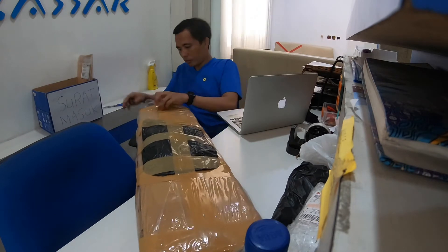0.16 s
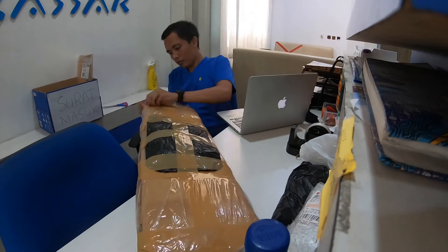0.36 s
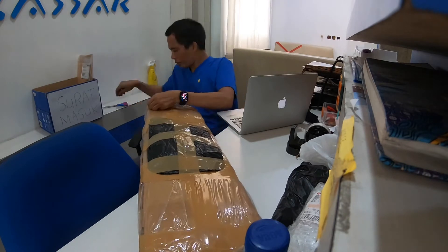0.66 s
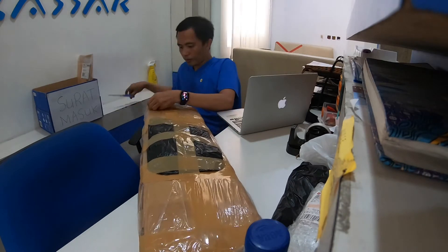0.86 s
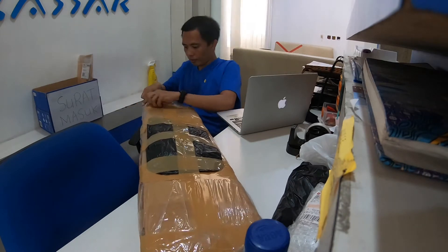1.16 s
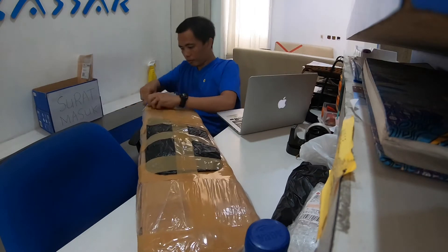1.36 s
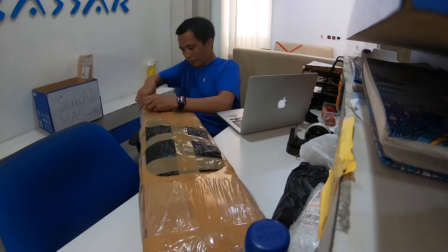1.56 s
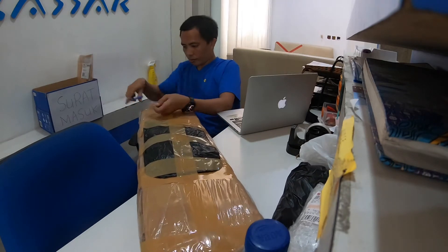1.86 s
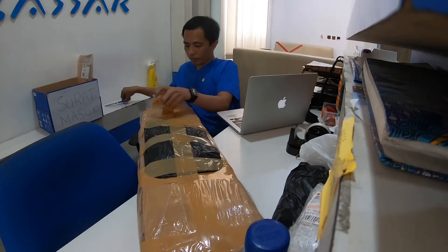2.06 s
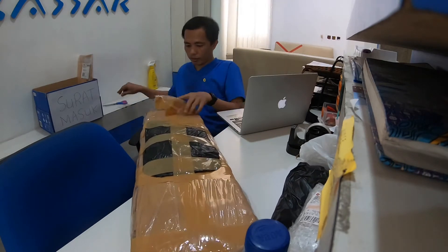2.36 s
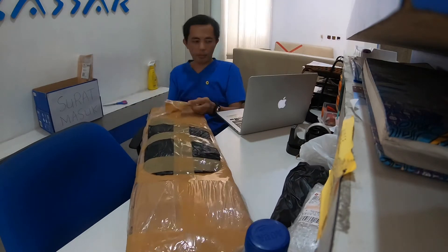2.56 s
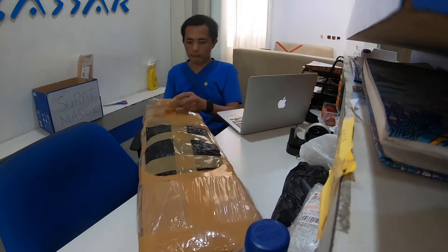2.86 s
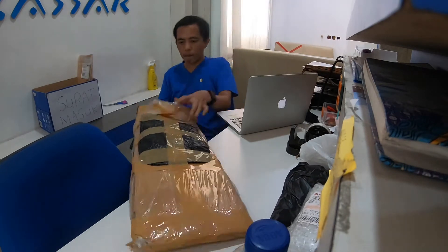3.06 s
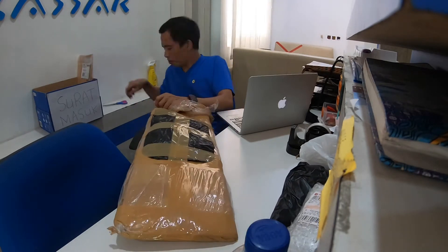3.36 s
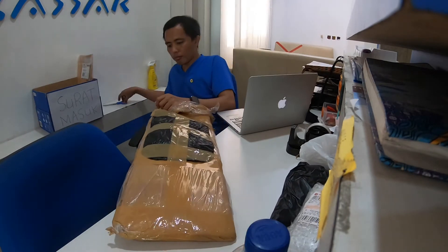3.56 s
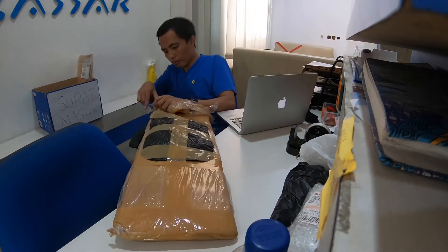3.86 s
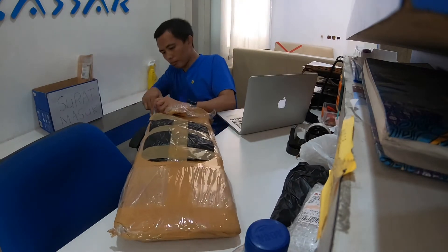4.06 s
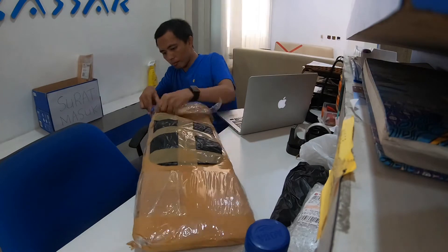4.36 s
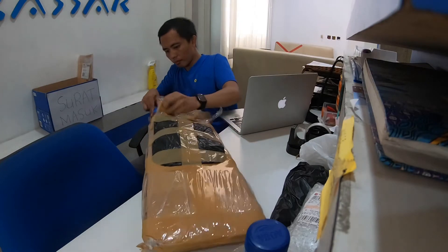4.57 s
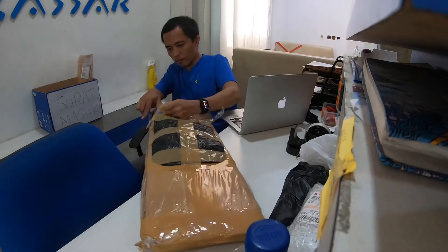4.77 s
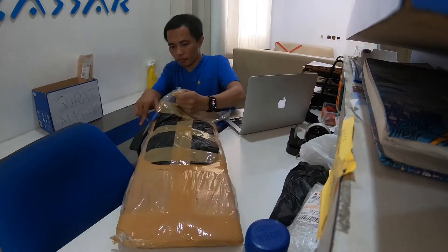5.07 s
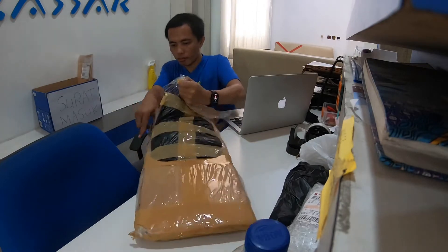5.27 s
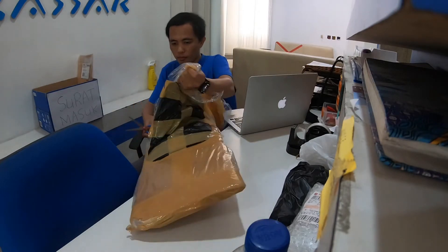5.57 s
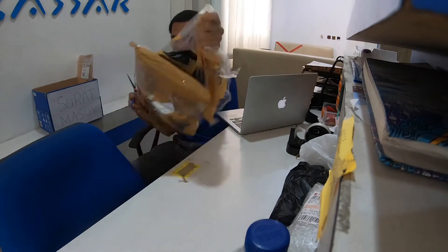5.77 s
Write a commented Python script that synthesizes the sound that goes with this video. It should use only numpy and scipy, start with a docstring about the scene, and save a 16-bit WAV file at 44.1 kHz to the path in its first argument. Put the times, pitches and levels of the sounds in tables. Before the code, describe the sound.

Close, dry crackles of plastic wrap and ringing tape snaps mix with hollow cardboard bumps and short drags across a desk in a quiet office.

```python
"""Parcel unwrapped on a desk

A taped parcel is opened by hand on an office desk, before a small camera standing on the same desk.
Plastic wrap crinkles and snaps as shaped noise, and taut tape rings through a bank of resonances.
Bumps ring the parcel wall as decaying modes, and bumps and drags drum the swaying modes of the desk top.
Ventilation hisses and hums steadily; the camera's stereo picture collapses to mono twice and reopens."""
import sys
import numpy as np
from scipy import signal
from scipy.fft import rfft, irfft, next_fast_len
from scipy.io import wavfile
from scipy.ndimage import map_coordinates

SR = 44100
rng = np.random.default_rng(int(sys.argv[2]) if len(sys.argv) > 2 else 0)


def dump_mix(stems):
    """Bounce the given channels to the path in sys.argv[1] as a 16-bit WAV at rate SR."""
    frames = np.atleast_2d(stems).T  # one column per channel
    limited = np.clip(frames, -1, 1)  # hard clip at full scale
    pcm = np.round(limited * 32767).astype(np.int16)
    wavfile.write(sys.argv[1], SR, pcm)


N = 260631

# Ventilation hiss, spectral density: (frequency [Hz], relative level [dB])
AIR_SPECTRUM = [(30, -55), (80, -32), (170, -21), (340, -27), (455, 1.5), (560, -13.5), (850, -23),
                (1600, -19), (5000, -15), (10000, -28.5), (14000, -67), (16000, -55)]
# Duct resonances: (frequency [Hz], width [Hz], relative level [dB])
DUCT_MODES = [(331.5, 11.3, -5.5), (455.2, 6.4, 6), (540, 99, -19), (795, 49, -9)]
HISS_DB, HUM_DB = -50.5, -47.5

# Parcel shoved over the desk:
# (time [s], rise constant [s], length [s], drumming level [dB], low modes re drumming [dB])
SHOVES = [(-0.01, .01, .05, -27.5, -16), (0.064, .008, .035, -8.5, -25),
          (0.108, 0.008, 0.049, -14.5, -10.5), (1.294, 0.02, 0.1, -18, -9.5),
          (1.435, .008, 0.058, -26.5, -20), (1.512, .008, 0.033, -15.5, -7.5), (1.569, .02, 0.041, -23, -5),
          (1.689, 0.028, 0.11, -13, -13), (1.83, 0.019, 0.052, -18, -5.5), (1.91, 0.0065, 0.026, -29, -9),
          (2.01, 0.021, .05, -34.5, -18), (2.246, 0.0072, 0.056, -18, -7), (2.42, .008, 0.028, -34, -20),
          (2.557, 0.0042, 0.023, -18, -14), (2.748, .008, 0.063, -29, -13), (2.885, .006, 0.14, -37, -8.5),
          (3.152, .02, 0.086, -33.5, -9), (3.91, .006, .06, -41, -12), (4.001, .008, 0.026, -34, -2),
          (4.125, .01, 0.029, -32, -13), (4.381, 0.0051, 0.064, -9, -18), (4.454, 0.0053, 0.043, -21, -3.5),
          (4.635, 0.028, .11, -28.5, -10), (4.82, .02, 0.052, -38, -8), (4.912, .005, 0.011, -18, -10),
          (4.942, .01, 0.055, -29, 1), (4.999, .025, 0.06, -18, -11), (5.099, .05, 0.076, -11.5, -18),
          (5.224, .008, 0.061, -24, -7.5), (5.366, 0.01, 0.089, -11, -9.5), (5.518, 0.013, 0.082, -20, -12),
          (5.605, .006, .05, -42, -19)]
SAG_DB_PER_S, STOP_DB_PER_S = 79, 602  # decay while sliding; further decay after the stop
# Hands resting and working on the parcel: (time [s], drumming level [dB], scuff level [dB])
HANDS = [(0, -45, -27.5), (.06, -45, -47), (.3, -49, -44.5), (.55, -70, -45), (.8, -55, -46.5),
         (1.15, -56.5, -42.5), (1.6, -37, -43), (2, -58, -45.5), (2.6, -44, -42.5), (3, -48, -39),
         (3.3, -50.5, -43.5), (3.8, -61, -49), (4.15, -48, -37), (4.6, -50, -46.5), (4.9, -54, -40.5),
         (5.3, -53, -40), (5.7, -56, -41.5), (5.91, -56, -44.5)]
HANDS_LOW_DB, SHOVE_SCUFF_DB = -12, -23  # both relative to the drumming
# Parcel bumps: (time [s], relative wall level [dB], relative desk level [dB], decay scale [s])
BUMPS = [(0.062, -14, -10, 0.095), (0.117, -19, -16, 0.069), (0.331, -25, -25, 0.21),
         (0.447, -25.5, -34, 0.19), (0.596, -44, -36, 0.046), (1.168, -28.5, -23.5, 0.12),
         (1.285, -25.5, -33, 0.11), (1.316, -30, -22, 0.079), (1.436, -43, -28.5, 0.14),
         (1.51, -21.5, -13.5, 0.13), (1.57, -37, -32, 0.067), (1.71, -33, -19.5, 0.13),
         (1.821, -23, -23, 0.082), (1.851, -28, -17.5, 0.06), (1.895, -29, -23, 0.11),
         (2.013, -32, -40, 0.11), (2.249, -22, -14, 0.13), (2.426, -32, -39, 0.061),
         (2.562, -13, -11, 0.062), (2.712, -24, -22, 0.068), (2.762, -27.5, -25.5, 0.073),
         (2.889, -39, -46, 0.08), (2.911, -24, -27, 0.074), (2.947, -32, -30, 0.097),
         (3.093, -33, -46, 0.09), (3.151, -16, -27.5, 0.09), (3.179, -31, -40, 0.1),
         (3.701, -40, -47, 0.16), (3.9, -39, -41, 0.098), (4.004, -31, -32.5, 0.16),
         (4.068, -29.5, -35.5, 0.25), (4.134, -24.5, -23, 0.095), (4.214, -34, -31, 0.1),
         (4.383, -11, -13, 0.086), (4.409, -17, -5, 0.029), (4.555, -29, -33, 0.084),
         (4.634, -21, -31.5, 0.2), (4.684, -34, -31, 0.098), (4.727, -27.5, -28.5, 0.1),
         (4.804, -26, -32.5, 0.094), (4.912, -22.5, -24, 0.09), (4.962, -23.5, -22.5, 0.1),
         (5.014, -23.5, -19, 0.11), (5.082, -19, -23, 0.046), (5.104, -21.5, -23, 0.056),
         (5.22, -45, -25.5, 0.14), (5.363, -14, -19.5, 0.081), (5.521, -20.5, -30, 0.059),
         (5.557, -24.5, -29, 0.32)]
# Desk top modes: (frequency [Hz], kicked level [dB], share of decay scale [1], dragged level [dB])
DESK_MODES = [(75, -21, 0.74, -7.5), (112.9, -11, 1.15, -1.5), (182.5, 3.5, 0.81, 0.5),
              (247.1, -1.5, 0.56, -15), (342, -3, 1.09, -14.5)]
# Parcel wall modes: (frequency [Hz], relative level [dB], share of decay scale [1])
WALL_MODES = [(423.5, 1.5, 0.27), (540.4, 1.5, 0.27), (655, -3.5, 0.39), (791, -4.5, 0.41),
              (972, -15, 0.48), (1160, -13.5, 0.086), (1485, -15, 0.16), (2070, -30, 0.03)]
# Scuffing, spectral density: (frequency [Hz], relative level [dB])
SCUFF_SPECTRUM = [(120, -10), (300, 0), (500, 1), (850, -7), (1300, -17), (2500, -37)]

# Film handled: (time [s], crinkle level [dB], fizz level [dB], rasp level [dB])
HANDLING = [(0.0, -43.5, -46, -29.5), (0.1, -42, -49, -49.5), (0.21, -59, -50, -33.5),
            (0.3, -56, -50, -54.5), (0.8, -56.5, -53, -50), (1.12, -55.5, -78, -54), (1.76, -46, -56, -52),
            (2.1, -47.5, -72, -49.5), (2.55, -51, -52, -49), (3.05, -51.5, -49, -52.5),
            (3.46, -57, -55, -52), (3.64, -61, -64, -44.5), (3.95, -46, -56, -54), (4.3, -50, -74, -49),
            (4.61, -57, -56, -57), (4.79, -44.5, -64, -44), (5.2, -48.5, -66, -47.5),
            (5.5, -40, -56.5, -44), (5.63, -50, -66, -49), (5.76, -35, -39, -39.5), (5.91, -42.5, -47, -58)]
# Snaps: (time [s], relative level [dB], relative tape level [dB], relative sheen level [dB],
# fold frequency [Hz], decay scale [s], crack re snap [dB])
SNAPS = [(0.054, -24, -30, -42, 7090, .25, 5), (.0778, -21, -28, -42, 7120, 0.31, 2),
         (0.1325, -12, -2.5, -18, 3500, .15, -4), (0.1437, -9, -13, -24, 1920, .19, -10),
         (0.2126, -23.5, -37, -38, 2800, .25, 7), (0.3594, -30.5, -41, -49, 5430, .17, 6),
         (0.4142, -29, -54, -50, 3370, 0.27, 2), (.903, -23.5, -29.5, -52, 1840, 0.2, -2),
         (1.0874, -25, -41, -44, 1970, 0.5, 2), (1.2863, -28, -39, -44, 1840, 0.37, -1),
         (1.5815, -28.5, -47, -46, 7430, 0.16, 2), (1.707, -25, -37, -39, 8920, 0.2, 7),
         (1.8202, -19, -34, -20, 3080, 0.5, 0.5), (2.0072, -28, -46, -41, 3250, .086, -2),
         (2.0193, -16.5, -39, -49, 6600, .13, 13), (2.1066, -20, -24, -36, 7060, 0.32, 2),
         (2.1387, -26.5, -37, -47, 6900, 0.35, -3), (2.3642, -10, -15, -30, 2720, 0.1, -5),
         (2.3691, -9.5, -8, -18, 1910, 0.27, 1.5), (2.4206, -45, -20.5, -39, 1950, 0.35, 9),
         (2.56, -20.5, -33, -48, 2520, 0.42, 3), (2.7497, -36, -32, -50, 4330, .15, 1),
         (2.807, -18, -25.5, -44, 1930, 0.21, -4), (2.9254, -35, -51, -26, 2540, 0.33, 3),
         (2.9726, -18.5, -24, -20, 5270, 0.37, -5), (3.127, -33, -43, -46, 3740, .2, 2),
         (3.3166, -23.5, -31.5, -49, 5510, 0.33, 3), (3.404, -29.5, -51, -38, 4180, .19, 2),
         (3.434, -30, -43, -48, 2990, .22, 0), (3.641, -45, -25.5, -48, 1950, 0.37, -6),
         (3.6678, -34, -25.5, -36, 7300, 0.27, 2), (3.6884, -22.5, -39, -31, 1950, .33, 0),
         (3.8704, -34, -36, -34, 2390, 0.6, -3), (3.9854, -30, -41, -43, 4500, 0.24, 5),
         (4.0743, -31, -33, -53, 3200, .17, 8), (4.1255, -27, -29.5, -49, 3880, .15, -3),
         (4.1889, -30, -46, -50, 6200, .22, 4), (4.3366, -26.5, -40, -40, 9300, .54, 0),
         (4.5586, -22, -31.5, -42, 9300, 0.47, 7), (4.6341, -18, -18, -19, 9450, 0.33, 7),
         (4.7007, -25.5, -38, -51, 2090, .53, 4), (4.8584, -21.5, -32, -48, 2570, .39, 2),
         (4.9009, -18.5, -20, -40, 2460, 0.26, 5.5), (4.9129, -21, -30, -37, 3100, 0.27, 4),
         (5.0428, -17, -37, -30, 8150, 0.26, -3), (5.1908, -20, -30.5, -35, 7200, 0.41, 11),
         (5.255, -25.5, -42, -40, 7100, 0.33, -5), (5.3719, -13, -20.5, -52, 2950, 0.33, 6),
         (5.4924, -28, -42, -38, 7960, 0.46, 2), (5.7014, -25, -30, -39, 3330, .35, -1),
         (5.7457, -26, -40, -36, 9690, .22, -1), (5.7907, -22, -29, -32, 8300, .3, -5),
         (5.817, -14, -28, -21, 9700, 0.16, 0), (5.8352, -32, -37, -34, 5040, 0.15, 4)]
FOLD_DB, CLICK_DB = -8.5, -5.5  # fold noise re snap level; first click re crack
# Taut tape resonances: (frequency [Hz], width [Hz], relative level [dB])
TAPE_MODES = [(848, 212, 2.5), (991, 50, 10), (1096, 54, 2.5), (1176.4, 18, 9), (1373, 105, 0),
              (1858, 35, -0.5), (1959, 30, -1.5), (2203, 54, -9.5), (2767, 90, -9), (3636, 40, -3.5),
              (5720, 250, -14), (7130, 200, -10.5), (8860, 280, -13.5), (10830, 320, -14.5)]
# Crinkling film, spectral density: (frequency [Hz], relative level [dB])
FILM_SPECTRUM = [(1200, -2.5), (2500, 0.5), (4000, 0), (5300, -1), (7200, 2.5), (9000, -0.5), (11000, -2),
                 (16000, -11)]
# Fizzing top of the film, spectral density: (frequency [Hz], relative level [dB])
SHEEN_SPECTRUM = [(6000, -72), (10500, -13), (13000, 2.5), (15000, -4), (16000, 5)]

# Side channel against mid: (frequency [Hz], level [dB], phase [rad], likeness [0-1])
SIDE_RELATION = [(35, -4, 1.57, 0.4), (110, 5.4, 2.98, 0.92), (180, -1.6, -2.28, 0.89),
                 (260, -1.6, -1.66, 0.21), (340, 0.5, -0.08, 0.7), (450, 0.7, -0.88, 0.52),
                 (800, 7.3, 0.08, 0.74), (1100, 4.0, -0.75, 0.4), (1800, 6.5, 2.77, 0.54),
                 (2300, 5.8, 2.39, 0.45), (4000, 1.0, 1.39, 0.58), (7000, -2.3, 0.13, 0.29),
                 (9000, -5.2, 1.72, 0.38), (15000, -2.8, 2.81, 0.46)]
# Colour of the mono setting: (frequency [Hz], level [dB])
MONO_COLOUR = [(60, -5), (110, 0), (250, -6.5), (460, 2), (800, -7), (2000, 2.5), (8000, -2.5),
               (14000, -0.5)]
# Fully mono: (from time [s], to time [s])
MONO_SPELLS = [(.43, 0.79), (2.75, 3.273)]
CLOSE_S, OPEN_S, WIDE = 0.38, 0.41, 0.94  # fade into mono, fade out of it, stereo share otherwise
TOP_HZ = 15900  # nothing passes from here up


def amp(db):
    """Decibel law: 20 dB is a factor of ten in amplitude."""
    return 10 ** (np.asarray(db) / 20)


def unit(x):
    """Normalisation to an rms of 1."""
    return x / np.sqrt(np.mean(x ** 2) + 1e-20)


def along(points, hz):
    """Interpolation on a log frequency axis, for each column after the frequency."""
    knots_hz, *columns = np.transpose(points)
    return [np.interp(np.log(hz + 1), np.log(knots_hz + 1), column) for column in columns]


def curves(rows):
    """Linear interpolation in time: one value per sample for each column after the time."""
    knots_s, *columns = np.transpose(rows)
    return [np.interp(np.arange(N) / SR, knots_s, column) for column in columns]


def wobble(rate):
    """Band-limited chance: two smooth random curves with rate knots a second."""
    step = np.arange(0, N + 64, 64)
    knots = rng.standard_normal((2, int(N * rate / SR) + 4))
    smooth = [map_coordinates(row, [step * rate / SR]) for row in knots]
    return np.array([np.interp(np.arange(N), step, row) for row in smooth])


def filtered(x, response):
    """Linear filtering: the spectrum is multiplied by a complex response of frequency."""
    m = next_fast_len(N + SR // 2)
    return irfft(rfft(x, m) * response(np.fft.rfftfreq(m, 1 / SR)), m)[..., :N]


def tinted(x, spectrum):
    """Spectral shaping, scaled so that white noise keeps rms 1."""
    return filtered(x, lambda hz: unit(amp(along(spectrum, hz)[0])))


def ringing(x, modes):
    """Modal superposition: parallel resonances of alternating sign; white noise keeps rms 1."""
    def response(f):
        total = 0
        for k, (centre, width, db) in enumerate(modes):
            damping = 1j * f * width
            total = total + (-1) ** k * amp(db) * damping / (centre * centre - f * f + damping)
        return total / np.sqrt(np.mean(np.abs(total) ** 2))
    return filtered(x, response)


def crackle(spiky_db, clump_db):
    """Impulsive noise: dense creases of uneven size that come in clumps, rms 1."""
    size = amp(spiky_db * rng.exponential(size=N) + clump_db * wobble(35)[0])
    return unit(size * rng.standard_normal((2, N)))


def air():
    """Broadband flow noise: steady ventilation hiss, with noise-driven duct resonances as a fuzzy hum."""
    level = amp(HISS_DB + 0.16 * wobble(2.0))
    hiss = level * tinted(rng.standard_normal((2, N)), AIR_SPECTRUM)
    return hiss + amp(HUM_DB) * ringing(rng.standard_normal((2, N)), DUCT_MODES)


def shoves():
    """Sliding friction: each shove builds up, sags and stops short; upper and low modes apart."""
    size, t = np.zeros((2, N + SR)), np.arange(SR // 3) / SR
    lead = SR // 2  # room for a shove begun before time zero
    for s, rise, length, db, low_db in SHOVES:
        fall_db = -SAG_DB_PER_S * t - STOP_DB_PER_S * np.clip(t - length, 0, 1)
        shape = (1 - np.exp(-t / rise)) * amp(fall_db)
        start = round(s * SR) + lead
        size[:, start:start + len(t)] += amp([[db], [db + low_db]]) * shape
    return size[:, lead:][:, :N]


def mode_envelope(t, hz, share, t60):
    """Modal damping: exponential decay after an onset that is quicker for higher modes."""
    return amp(-60 * t / (t60 * share + 0.012)) * (1 - np.exp(-t * hz / 0.46))


def swaying_mode(hz):
    """Random modulation: a sine whose level and pitch wander."""
    level = amp(wobble(30))
    phase = 2 * np.pi * np.cumsum(hz * (1 + 0.06 * wobble(30)), axis=1) / SR
    return level * np.sin(phase)


def desk():
    """Modal excitation: drags keep the desk modes shuddering; bumps kick them and ring the parcel wall."""
    wall, kick = np.zeros((2, N + SR)), np.zeros((len(DESK_MODES), N + SR))
    t = np.arange(SR // 5) / SR
    wall_hz, mode_db, wall_share = np.transpose(WALL_MODES)[..., None, None]
    desk_hz, kicked_db, desk_share, dragged_db = np.transpose(DESK_MODES)[..., None]
    chance = rng.standard_normal((len(BUMPS), 2, len(WALL_MODES), 2, 1))
    for (s, wall_db, desk_db, t60), (level_luck, pitch_luck) in zip(BUMPS, chance):
        span = slice(round(s * SR), round(s * SR) + len(t))
        pitch = wall_hz * (1 + 0.057 * pitch_luck)  # each mode of each bump lands at a slightly random pitch
        level = amp(wall_db - 2.0 + mode_db + 1.2 * level_luck)
        tones = level * mode_envelope(t, wall_hz, wall_share, t60) * np.sin(2 * np.pi * pitch * t)
        wall[:, span] += np.sum(tones, axis=0)
        kick[:, span] += amp(desk_db + kicked_db) * mode_envelope(t, desk_hz, desk_share, t60)

    drum_db, scuff_db = curves(HANDS)
    upper, low = np.hypot(shoves(), amp([drum_db, drum_db + HANDS_LOW_DB]))
    drag = amp(dragged_db) * np.where(desk_hz < 140, low, upper)
    mode_sizes = np.hypot(drag, kick[:, :N])
    shudder = sum(size * swaying_mode(mode[0]) for size, mode in zip(mode_sizes, DESK_MODES))

    scuff_size = np.hypot(amp(scuff_db), amp(SHOVE_SCUFF_DB) * upper)
    scuff = scuff_size * tinted(crackle(spiky_db=2.0, clump_db=3.0), SCUFF_SPECTRUM)
    return wall[:, :N] + shudder + scuff


def wrap():
    """Impulsive release: snaps crack, tear, pluck the tape and excite a fold; the film crinkles between."""
    tear, folds = np.zeros((3, N + SR)), np.zeros((2, N + SR))
    t = np.arange(SR // 3) / SR
    plucks, clicks = np.zeros((2, N))
    creases = crackle(spiky_db=2.0, clump_db=2.0)
    for s, db, tape_db, sheen_db, fold_hz, t60, crack_db in SNAPS:
        start = round(s * SR)
        span = slice(start, start + len(t))
        crack = amp(crack_db + 6.0 - 60 * t / 0.003)
        rip = amp(-60 * t / (t60 + 0.023))
        # the tape's ring builds up more slowly
        drone = amp(-60 * t / (0.53 * t60 + 0.0095)) * (1 - np.exp(-t / 0.0051))
        levels = amp([[db - 19.5], [sheen_db - 15], [tape_db - 8.5]])
        tear[:, span] += levels * [rip + crack, rip + crack, drone]
        plucks[start] = amp(tape_db + crack_db + 8)  # the crack plucks the tape
        clicks[start] = amp(db + crack_db + CLICK_DB)
        pocket = signal.iirpeak(fold_hz, 8.5, SR)  # the air pocket in the fold, Q 8.5
        fold_noise = signal.lfilter(*pocket, rip * rng.standard_normal((2, len(t))))
        folds[:, span] += amp(db + FOLD_DB) * fold_noise

    crinkle, fizz, rasp = np.hypot(tear[:, :N], amp(curves(HANDLING)))
    finer = unit(creases + rng.standard_normal((2, N)))
    film = crinkle * tinted(creases, FILM_SPECTRUM) + fizz * tinted(finer, SHEEN_SPECTRUM)
    film = film + tinted(clicks, FILM_SPECTRUM)
    tape = ringing(plucks + rasp * crackle(spiky_db=1.9, clump_db=2.5), TAPE_MODES)
    return film + folds[:, :N] + tape


def scene():
    """Superposition with two draws of chance: one for the mid, one for what differs at the two ports."""
    return air() + desk() + wrap()


def side_shares(hz):
    """Partial coherence: a phase-turned share of the mid and an unrelated share make the side."""
    turn = [(f, db, like * np.cos(rad), like * np.sin(rad)) for f, db, rad, like in SIDE_RELATION]
    db, re, im = along(turn, hz)
    unrelated = np.sqrt(np.clip(1 - re ** 2 - im ** 2, 0, 1))
    return amp(db) * np.array([re + 1j * im, unrelated])


def record(dry):
    """Mid-side stereo: the camera fades the side in and out, rounds off peaks and cuts the deep bass."""
    t = np.arange(N) / SR
    openings = [np.clip(np.maximum((a - t) / CLOSE_S, (t - b) / OPEN_S), 0, 1) for a, b in MONO_SPELLS]
    width = WIDE * np.prod(openings, axis=0)
    side = width * filtered(dry, side_shares).sum(axis=0)
    mono = filtered(dry[0], lambda hz: amp(along(MONO_COLOUR, hz)[0]))
    mid = width * dry[0] + (1 - width) * mono
    pair = np.array([mid + side, mid - side])
    pair = pair / (1 + np.abs(pair / .99) ** 6) ** (1 / 6)  # soft limit just below full scale
    return filtered(pair, lambda hz: (hz < TOP_HZ) / (1 + (45 / (hz + 1)) ** 2))


dry = scene()
out = record(dry)
dump_mix(out)
```